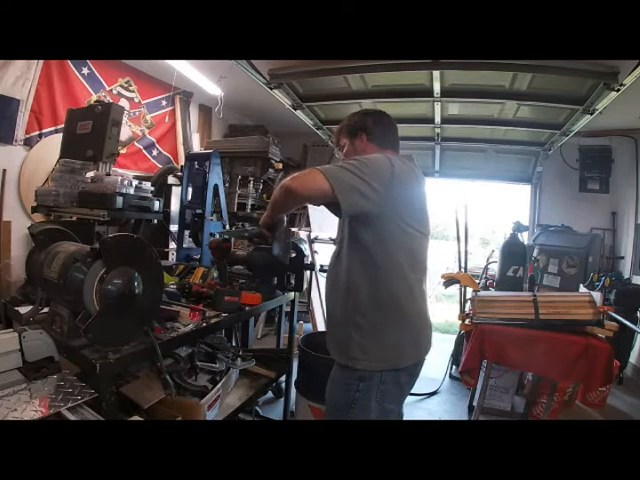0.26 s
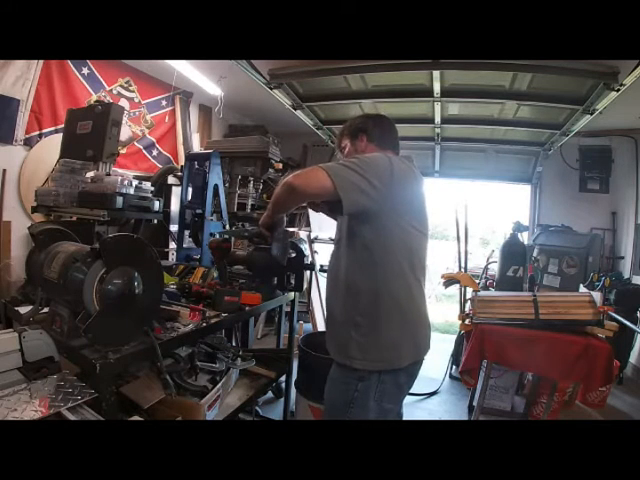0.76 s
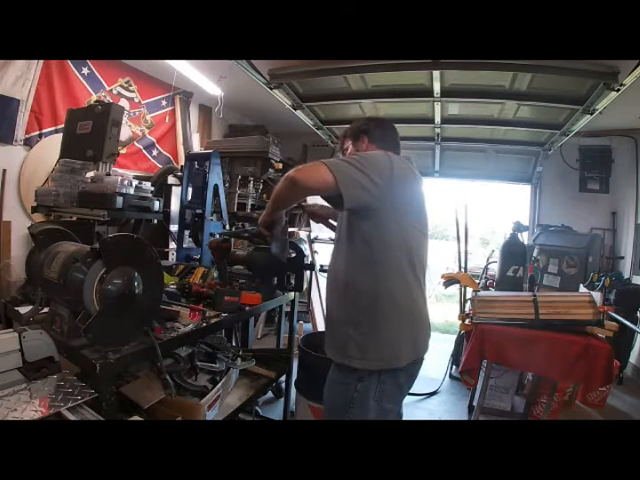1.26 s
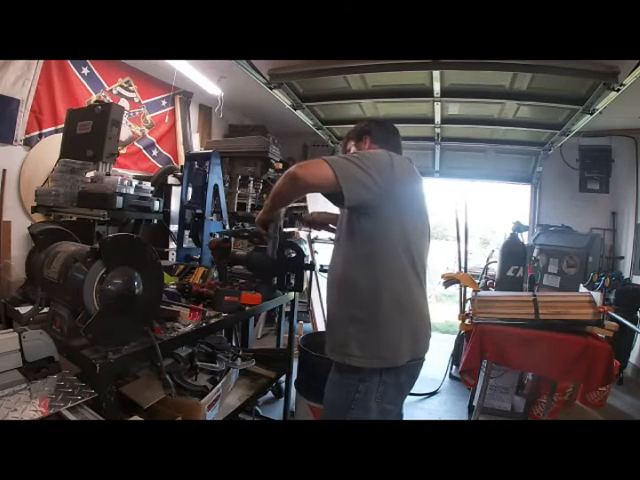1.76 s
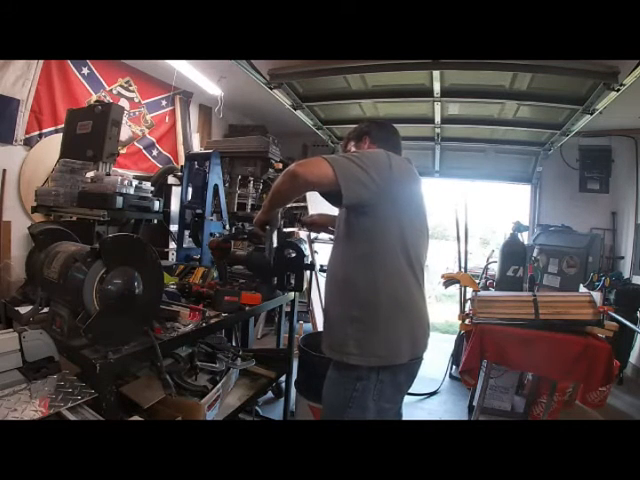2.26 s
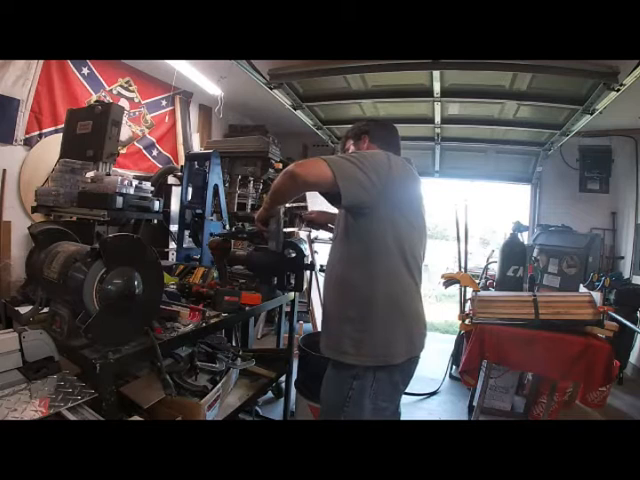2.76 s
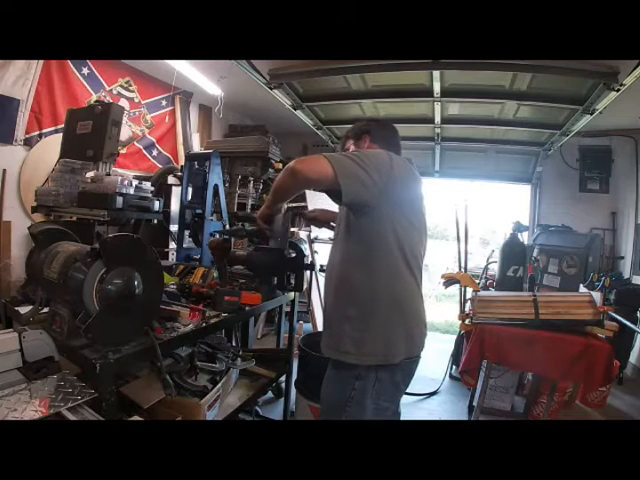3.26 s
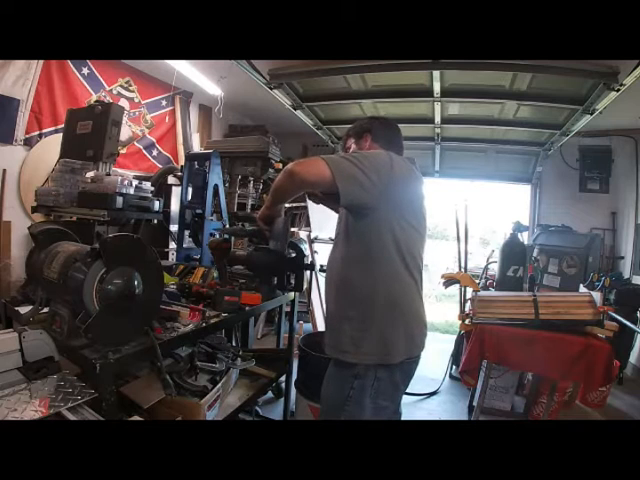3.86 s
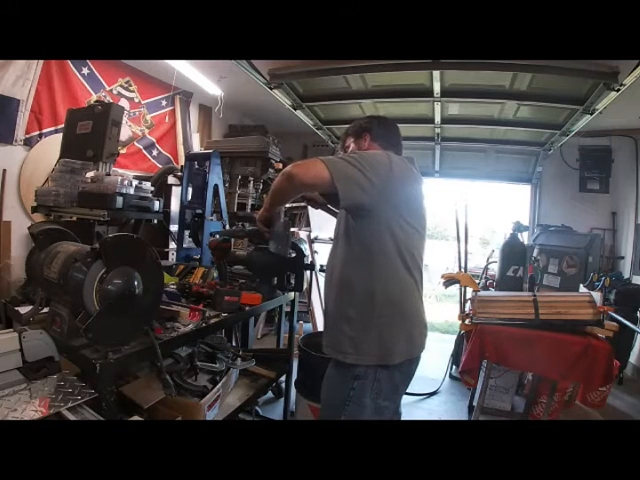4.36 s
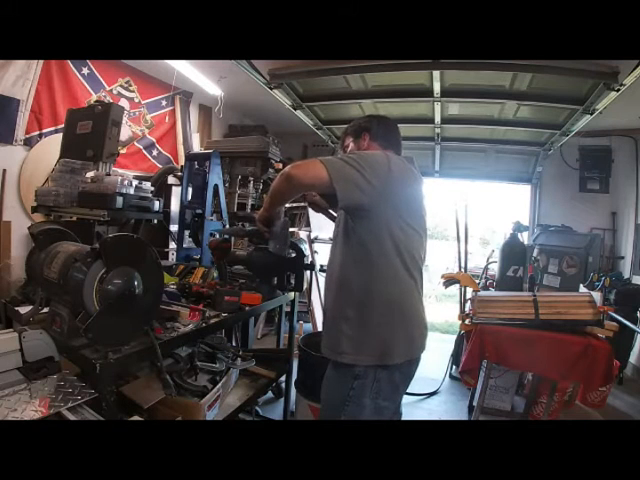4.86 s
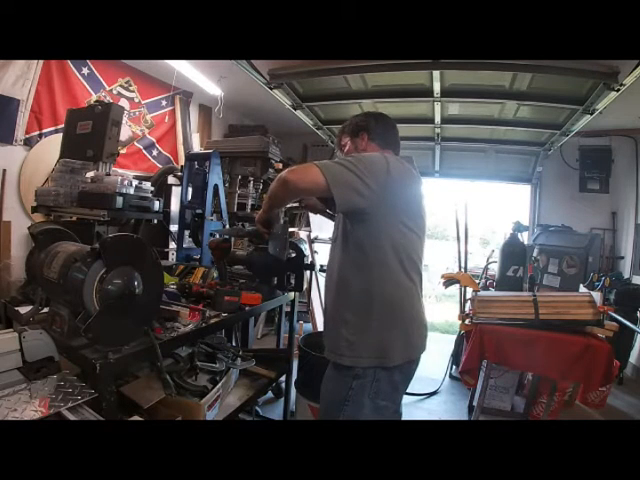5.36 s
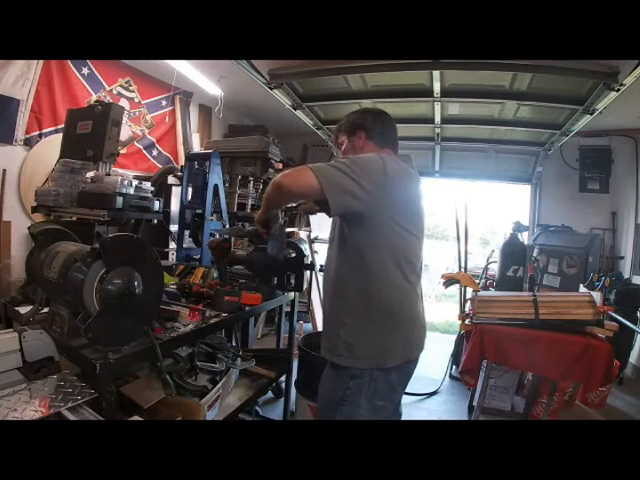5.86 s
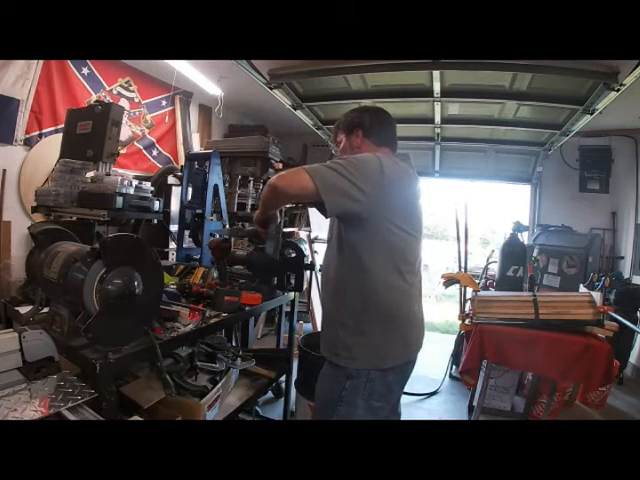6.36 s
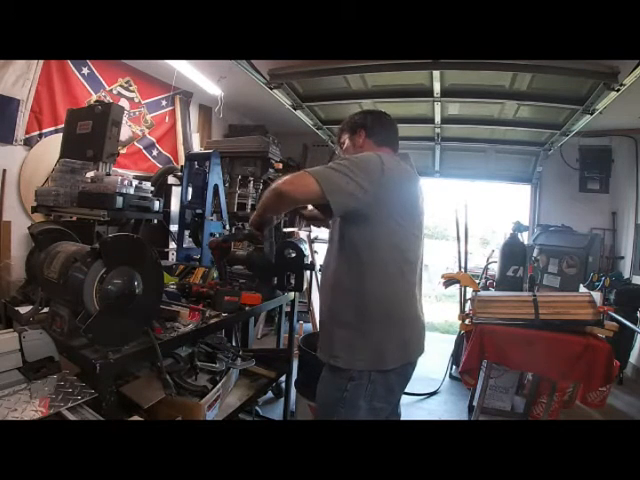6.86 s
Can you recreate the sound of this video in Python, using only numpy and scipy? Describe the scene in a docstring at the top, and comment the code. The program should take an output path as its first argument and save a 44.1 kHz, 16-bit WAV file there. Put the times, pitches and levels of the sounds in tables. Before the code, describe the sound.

In a cluttered garage with its door open, a man hammers a rivet on a bench vice at a steady pace, sixteen blows in seven seconds. Each blow gives a solid bench thump, sharp crack, short steel ring and sheet clank, then loose tools jingle and the room tail dies quickly. Later blows are duller in attack. Faint rumble, hum and flickering hiss lie beneath. The sound is nearly mono, loud peaks squeezed by the microphone's gain control.

```python
"""A hammer peens a rivet on a bench vice in a cluttered garage with the door open: 16 blows in 7 s.
Each blow: a bench thump (modes over several paths), steel rings, a clank, a crack of banded noise,
then loose tools (brief sines) and the garage (noise tail). Crack and tools change colour by blow.
From 5 s the crack is weaker. Throughout: rumble, wavering hum tones and a flickering hiss that
wavers, then fades after 3 s (shaped noise). Gain control turns down the loud parts."""
import sys
import numpy as np
from scipy import signal
from scipy.io import wavfile

SR = 44100
rng = np.random.default_rng(int(sys.argv[2]) if len(sys.argv) > 2 else 0)


def unload_wav(signal):
    """Save mono or channel-first audio to the path in sys.argv[1] as 16-bit WAV at rate SR, clipped to [-1, 1]."""
    wavfile.write(
        sys.argv[1],
        SR,
        np.round(np.clip(np.atleast_2d(signal).T, -1, 1) * 32767).astype(np.int16),
    )


def natural_amplitude(level_db):
    """Convert a level in decibels to a linear amplitude factor, elementwise."""
    exponent = np.asarray(level_db, float) / 20
    return 10 ** exponent


N = 313110

# hammer blows: t/s, thump level/dB, ping level/dB, crack level/dB, crack brightness/(dB per octave)
BLOWS = [(0.0881, 1, -18, 2, -0.8), (0.5323, 2.5, -32, 3, -1.1), (0.9847, 1, -11.5, 3.5, -2.5),
         (1.4373, 2.5, -22, 1.7, -2.3), (1.8837, 0, -17, 1, -1), (2.3500, -4, -13.5, 2.5, .5),
         (2.8563, 0.5, -21.5, 2.7, -3), (3.31, 3.5, -11.5, 5, -5.5), (3.7757, 3.5, -9.5, 2, -0.5),
         (4.2263, 3, -10, 4, -0.8), (4.6508, 3.5, -3, 1.2, -7), (5.1016, 2, -8.5, -3.3, -1.3),
         (5.5414, 1.5, -11, -5.5, 1), (5.9770, 0, -11.5, -7, 1.5), (6.3967, 0.5, -12.5, -6.5, 1),
         (6.8232, 1.5, -12.5, -4.5, 0.6)]
BLOW_S, THUMP_DB, PING_DB, STRENGTH_DB, TILT_DB_PER_OCT = np.transpose(BLOWS)
# bench and vice modes: f/Hz, level/dB, t60/s, first swing (only the sign counts)
BENCH_MODES = [(137.1, -36, 0.32, 0.99), (189.9, -22.5, 0.24, -1), (207, -29.5, 0.34, -0.95),
               (210.5, -1.5, 0.019, 0.94), (234.2, -10, 0.15, -1.02), (273.93, -15.5, 0.27, -0.89),
               (296.8, -16, 0.27, -1.2), (322.5, -13, 0.14, 0.97), (359, -12, 0.1, -0.98),
               (363, -24.5, 0.18, 0.95), (555.4, -20, 0.11, -1), (549.8, -22, 0.063, 0.96),
               (580, -31, 0.038, -0.92), (615.3, -21, 0.016, -1.05), (620.8, -29, 0.14, 1),
               (712.5, -28, 0.16, 1), (895, -27, 0.019, -0.87), (945, -29, 0.098, 1),
               (1114, -32.5, 0.063, 0.88), (1161, -38.5, 0.23, 1), (1270, -29, 0.17, 1)]
# paths of the thump: delay/s, level/dB
THUMP_PATHS = [(.00012, 5), (.00174, 4), (.00665, 12.5), (.00838, 7.5), (0.0597, -10)]
# hammer head and anvil modes: f/Hz, level/dB, t60/s
STEEL_MODES = [(2230, -25.5, 0.019), (3405, -19, 0.0069), (4630, -27.5, .03), (5288, -43.5, 0.22),
               (5100, -45.5, .05), (5600, -33, 0.0041), (5800, -38, 0.0077), (5650, -45, 0.142),
               (6650, -26, 0.019), (8660, -31, 0.024), (8760, -55, 0.16), (10250, -36.5, 0.026)]
# clank modes of the sheet under the rivet: f/Hz, level/dB, t60/s
SHEET_MODES = [(2052, -3, 0.066), (2147, -5, 0.049), (2290, -10, 0.043)]
# crack spectrum: f/Hz, level/dB
CRACK_SPECTRUM = [(400, 2), (700, 3.5), (1000, 1.5), (1400, -0.5), (2000, -8), (3000, -11.5), (4000, -11),
                  (5500, -11), (6500, -16.5), (9000, -15.5), (11000, -24), (13000, -20), (15500, -47.5)]
# garage decay: f/Hz, t60/s
GARAGE_DECAY = [(100, 0.21), (300, 0.25), (800, 0.27), (2000, 0.29), (5000, 0.25), (9000, 0.21),
                (14000, 0.22)]
# background course: t/s, rumble level/dB, hiss level/dB
AIR_LEVELS = [(0, -34, -46), (1, -34, -48.5), (2.2, -34, -47), (2.75, -31.5, -46), (3.3, -34, -46.5),
              (4.601, -37, -50), (5.501, -37.5, -56), (6.3, -36, -55), (7.1, -36.5, -57)]
# rumble spectrum shape: f/Hz, relative level/dB
RUMBLE_SPECTRUM = [(20, -29), (35, -3), (50, 1.5), (70, 5), (100, -11), (125, 5), (160, -5.5), (250, -6.5),
                   (320, -7.5), (500, -15.5)]
# hiss spectrum shape: f/Hz, relative level/dB
HISS_SPECTRUM = [(300, -61), (500, -3.5), (630, 0), (800, -7), (1200, -9.5), (1600, -16), (2500, -16.5),
                 (3200, -25.5), (4000, -24), (5200, -27.5), (6400, -47), (8000, -50), (10000, -53),
                 (14000, -59.5)]
# wavering hum tones: f/Hz, width/Hz, level/dB
HUM_TONES = [(80.5, 7.3, -43.5), (158, 2.8, -50), (24.3, 13, -46.5)]

THUMP_LOW_HZ = 115   # the thump is cut away below this
BENCH_UNEVEN_DB, STEEL_UNEVEN_DB, BAND_UNEVEN_DB, TOOLS_UNEVEN_DB = 1.5, 4, -1, 6   # blow to blow
TILT_FROM_HZ, TILT_TO_HZ = 2470, 9280   # brightness tilts the crack between these
CRACK_DB, CRACK_T60_S = 1.5, 0.022
CLATTER_DB, CLATTER_RISE_S = 2, 0.012
# power share of the noise that repeats at every blow (the same walls answer), halved at this pitch
SAME_SHARE, SAME_BELOW_HZ = 0.92, 2600
TOOLS_HZ, TOOLS_DB = (2413, 11240), -21.5   # pitch range; level re crack spectrum
TOOLS_T60_CYCLES = 110
THUMP_WET_DB, STEEL_WET_DB, TOOLS_WET_DB = -10.5, 9, 5.5   # sends to the garage
RUMBLE_TOP_HZ = 399
WIDE_HZ, WIDE_DB = 13080, 1.5
PORT_HZ, PORT_DB = [5150, 5900], 2.5   # microphone port: band edges, gain of the added band
SQUEEZE_DB, SQUEEZE_SHARE, RELEASE_DB_PER_S = -24, 0.33, 190   # threshold, share of excess cut
SQUEEZE_ATTACK_S = 0.00033
CEILING = 1.2
TOP_CUT_HZ = 15750


def rms_one(x):
    """Scale to rms 1."""
    return x / np.sqrt(np.mean(x ** 2) + 1e-20)


def at_hz(points, hz):
    """Read a table along log frequency."""
    table_hz, values = np.transpose(points)
    return np.interp(np.log(hz), np.log(table_hz), values)


def bands(low_hz, high_hz):
    """Third-octave band-passes: (centre/Hz, filter)."""
    edges = low_hz * 2 ** (np.arange(3 * np.log2(high_hz / low_hz) + 1) / 3)
    return [(np.sqrt(a * b), signal.butter(2, [a, b], "band", fs=SR, output="sos"))
            for a, b in zip(edges, edges[1:])]


def clicks(db):
    """One click per blow excites the resonators."""
    out = np.zeros(N)
    out[np.round(BLOW_S * SR).astype(int)] = natural_amplitude(db)
    return out


def ring(excitation, hz, t60_s):
    """Two-pole resonator: a unit click sets off a dying sine of height about 1."""
    r = natural_amplitude(-60 / (t60_s * SR))
    w = 2 * np.pi * hz / SR
    return signal.lfilter([0, np.sin(w)], [1, -2 * r * np.cos(w), r * r], excitation + 1e-18)


def dying(db, t60_s):
    """Exponential envelope: starts at each blow, falls 60 dB in t60."""
    return signal.lfilter([1], [1, -natural_amplitude(-60 / (t60_s * SR))], clicks(db) + 1e-18)


def colour_db(hz):
    """Crack level of each blow at a frequency: strength plus brightness tilt."""
    octaves = np.log2(np.clip(hz, TILT_FROM_HZ, TILT_TO_HZ) / TILT_FROM_HZ)
    return STRENGTH_DB + octaves * TILT_DB_PER_OCT


def thump():
    """Every blow excites the same bench modes, a little unevenly, heard along the same delayed paths."""
    uneven = rng.standard_normal((len(BENCH_MODES), len(BLOWS)))
    rings = 0
    for (hz, db, t60_s, swing), chance in zip(BENCH_MODES, uneven):
        blow_db = db + THUMP_DB + BENCH_UNEVEN_DB * chance
        rings = rings + np.sign(swing) * ring(clicks(blow_db), hz, t60_s)
    low_cut = signal.butter(2, THUMP_LOW_HZ, "high", fs=SR, output="sos")
    rings = signal.sosfilt(low_cut, rings)
    n = np.arange(N)
    return sum(natural_amplitude(db) * np.interp(n - delay_s * SR, n, rings) for delay_s, db in THUMP_PATHS)


def crack_and_clatter():
    """Brief hard chatter, then loose tools and dense reflections build up and die band by band."""
    fresh, walls = rng.standard_normal((2, 2, N))
    n = np.arange(N)
    since_blow = n - np.maximum.accumulate(n * (clicks(0) > 0))
    rise = np.exp(-1 / (CLATTER_RISE_S * SR))
    uneven = rng.standard_normal((len(BLOWS), 20))
    out = 0
    for k, (hz, sos) in enumerate(bands(400, 16000)):
        high = np.clip(hz / 2000, 0, 1)   # the lows follow the thump
        db = at_hz(CRACK_SPECTRUM, hz) + colour_db(hz) * high + THUMP_DB * (1 - high)
        db = db + BAND_UNEVEN_DB * high * uneven[:, k]
        share = SAME_SHARE / (1 + (hz / SAME_BELOW_HZ) ** 2)
        # neighbouring bands get unrelated noise
        white = np.sqrt(1 - share) * fresh[k % 2] + np.sqrt(share) * walls[k % 2, since_blow]
        crack = dying(db + CRACK_DB, CRACK_T60_S)
        clatter = dying(db + CLATTER_DB, at_hz(GARAGE_DECAY, hz))
        clatter = signal.lfilter([1 - rise], [1, -rise], clatter)
        out = out + signal.sosfilt(sos, white * (crack + clatter))
    return out


def steel():
    """Hammer head and anvil modes, struck a little unevenly each time."""
    uneven = rng.standard_normal((len(STEEL_MODES), len(BLOWS)))
    return sum(ring(clicks(db + colour_db(hz) + STEEL_UNEVEN_DB * chance), hz, t60_s)
               for (hz, db, t60_s), chance in zip(STEEL_MODES, uneven))


def ping():
    """The sheet under the rivet clanks briefly in a few modes."""
    return sum(ring(clicks(PING_DB + db), hz, t60_s) for hz, db, t60_s in SHEET_MODES)


def tools(count=30):
    """Loose tools on the bench ring briefly at scattered pitches, in a new balance at each blow."""
    pitches_hz = np.geomspace(*TOOLS_HZ, count) * rng.uniform(0.97, 1.03, count)
    uneven = rng.standard_normal((count, len(BLOWS)))
    out = 0
    for k, (hz, chance) in enumerate(zip(pitches_hz, uneven)):
        db = TOOLS_DB + at_hz(CRACK_SPECTRUM, hz) + colour_db(hz)
        db = db + TOOLS_UNEVEN_DB * np.minimum(chance, 1.7)
        out = out + (-1) ** k * ring(clicks(db), hz, TOOLS_T60_CYCLES / hz)
    return out


def garage(x):
    """The same reflections for every blow, building up in a few ms and dying band by band."""
    t = np.arange(SR // 2) / SR
    white = rng.standard_normal((2, len(t))) * (1 - np.exp(-t / 0.0065))
    tail = sum(signal.sosfilt(sos, white[k % 2] * natural_amplitude(-60 * t / at_hz(GARAGE_DECAY, hz)))
               for k, (hz, sos) in enumerate(bands(100, 12000)))
    return signal.fftconvolve(x, tail / np.sqrt(np.sum(tail ** 2)))[:N]


def drift(rate_hz):
    """Slow random wander of rms 1: low-passed noise, one value per 40 samples, interpolated."""
    r = np.exp(-2 * np.pi * rate_hz * 40 / SR)
    white = rng.standard_normal(N // 40 + 2002)
    slow = signal.lfilter([1], [1, -2 * r, r * r], white)[2000:]   # skip the run-in
    return np.interp(np.arange(N) / 40, np.arange(len(slow)), rms_one(slow))


def coloured_noise(spectrum, patchy_db):
    """Noise of rms 1 in third-octave bands, each band's level drifting on its own by patchy_db."""
    white = rng.standard_normal((2, N + SR))   # neighbouring bands get unrelated noise
    out = 0
    for k, (hz, sos) in enumerate(bands(spectrum[0][0], min(spectrum[-1][0], 15000))):
        gain = natural_amplitude(at_hz(spectrum, hz) + patchy_db * drift(4.8))
        out = out + gain * signal.sosfilt(sos, white[k % 2])[SR:]
    return rms_one(out)


def background():
    """Rumble from outside, hum tones as noise in narrow resonances, and flickering hiss."""
    t_s, *levels = np.transpose(AIR_LEVELS)
    rumble_db, hiss_db = (np.interp(np.arange(N) / SR, t_s, level) for level in levels)
    top_cut = signal.butter(6, RUMBLE_TOP_HZ, fs=SR, output="sos")
    rumble = signal.sosfilt(top_cut, coloured_noise(RUMBLE_SPECTRUM, patchy_db=0)) * natural_amplitude(rumble_db)
    hum = sum(natural_amplitude(db) * rms_one(ring(rng.standard_normal(N), hz, 2.4 / width_hz))
              for hz, width_hz, db in HUM_TONES)
    hum = hum * natural_amplitude(rumble_db - rumble_db.mean())   # follows the rumble
    hiss = coloured_noise(HISS_SPECTRUM, patchy_db=2.1) * natural_amplitude(hiss_db)
    return rumble + hum + hiss


def scene():
    """Nearly mono: only the very top of the crack and clatter is spread wide."""
    low, high, rings, clank, loose = thump(), crack_and_clatter(), steel(), ping(), tools()
    send = natural_amplitude(THUMP_WET_DB) * (low + clank) + natural_amplitude(STEEL_WET_DB) * rings + natural_amplitude(TOOLS_WET_DB) * loose
    mid = low + high + rings + clank + loose + garage(send) + background()
    top = signal.butter(8, WIDE_HZ, "high", fs=SR, output="sos")
    side = natural_amplitude(WIDE_DB) * np.roll(signal.sosfilt(top, high), 400)   # 400 samples late
    return np.array([mid + side, mid - side])


def band_limit(x):
    """A steep low-pass at the top of the band."""
    return signal.sosfilt(signal.butter(12, 16030, fs=SR, output="sos"), x)


def record(dry):
    """Port resonance, gain control with a steady release, rounded peaks, top cut."""
    port = signal.butter(2, PORT_HZ, "band", fs=SR, output="sos")
    dry = dry + natural_amplitude(PORT_DB) * signal.sosfilt(port, dry)
    peak_db = 20 * np.log10(np.abs(dry).max(axis=0) + 1e-9)
    over_db = np.maximum(peak_db - SQUEEZE_DB, 0)
    slope_db = RELEASE_DB_PER_S * np.arange(N) / SR
    held_db = np.maximum.accumulate(over_db + slope_db) - slope_db
    attack = np.exp(-1 / (SQUEEZE_ATTACK_S * SR))
    cut_db = SQUEEZE_SHARE * signal.lfilter([1 - attack], [1, -attack], held_db)
    rounded = CEILING * np.tanh(dry * natural_amplitude(-cut_db) / CEILING)
    top_cut = signal.cheby2(24, 70, TOP_CUT_HZ, fs=SR, output="sos")
    return band_limit(signal.sosfilt(top_cut, rounded))


dry = scene()
out = record(dry)
unload_wav(out)
```